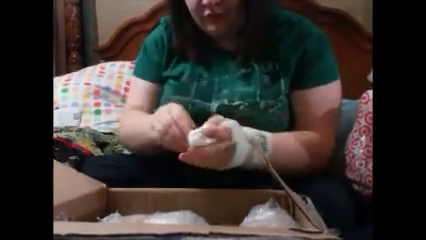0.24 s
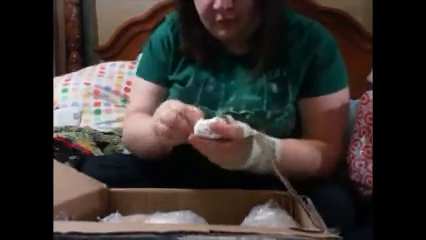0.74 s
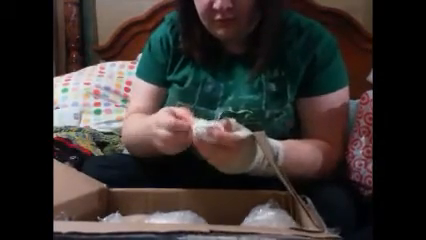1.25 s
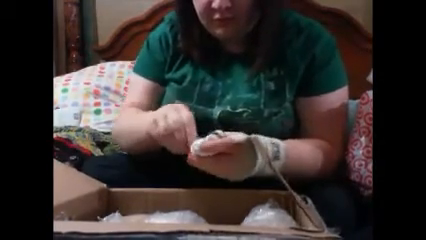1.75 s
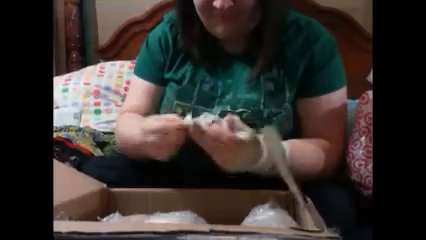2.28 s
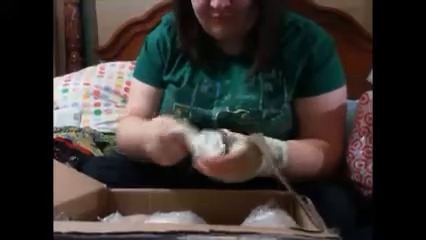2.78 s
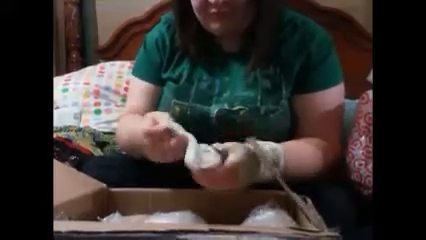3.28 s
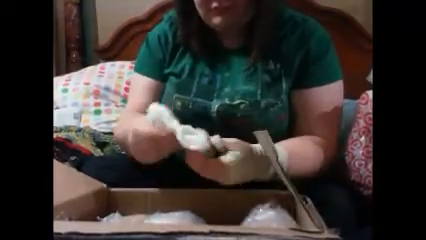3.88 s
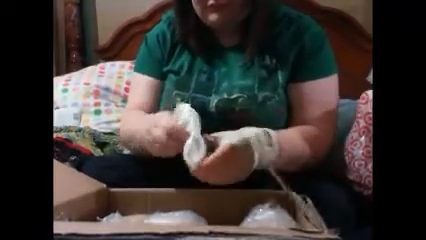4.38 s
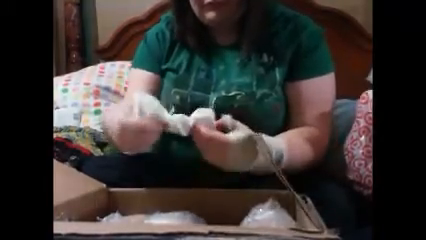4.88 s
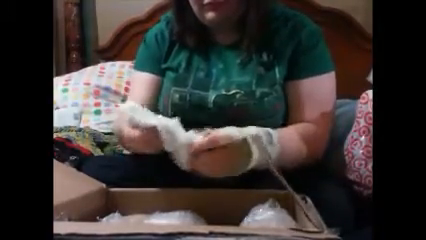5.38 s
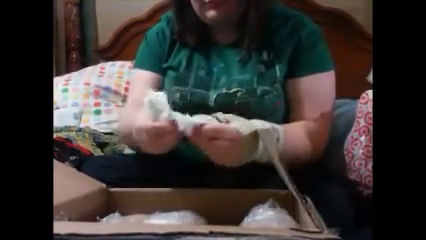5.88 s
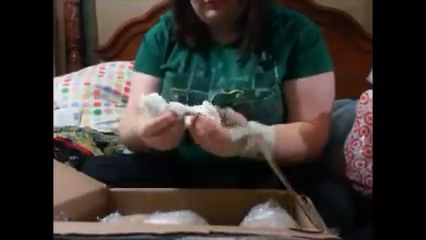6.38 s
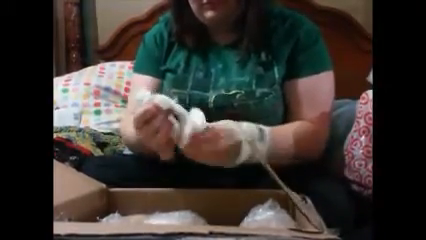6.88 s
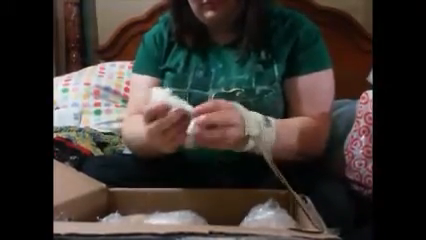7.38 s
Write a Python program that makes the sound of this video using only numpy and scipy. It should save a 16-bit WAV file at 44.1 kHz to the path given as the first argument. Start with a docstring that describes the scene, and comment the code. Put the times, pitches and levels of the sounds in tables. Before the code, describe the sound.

A quiet small room with a faint steady hiss, close microphone, sound almost all on the left. From 0.2 s fingers pick at tissue paper: light rustle, small scrapes and scattered dry snaps, sharp ones near 0.5, 0.95, 1.4 and 1.8 s. Around 2.4 s a fold gives way with a loud crack and a rip of about a tenth of a second, ringing hollow briefly; more snaps follow until 2.85 s, when a strong swish of sliding paper arrives. Short scrapes at 3.1 s, then soft full strokes from 3.7 to 4.1 s and the broadest at 4.5 to 4.8 s. Deep, soft bumps and rumble of arms on the bed sit beneath, notably at 2.5, 3.9 to 4.3 and 5.6 s. Quick rustles continue from 5.6 to 6.5 s with fewer clicks, then fade to gentle crinkling and faint rubs until about 7.6 s.

```python
"""A small room with a faint, short, bright tail, and a bed: hands unwrap tissue paper from an object.
Sliding paper is filtered noise with stick-slip clicks; small wrinkles tick as resonant clicks.
Fingers pick at the wrapping: scrapes are runs of slips, and snaps are pulses through a resonance.
A fold rips open in dense slips with a short modal ring, then the sheet slides off in soft strokes.
Arm movements rumble as low noise and bump the bed as damped low sines, over a faint steady hiss."""
import sys
import numpy as np
from scipy import signal
from scipy.fft import rfft, irfft
from scipy.io import wavfile
from scipy.ndimage import uniform_filter1d

SR = 44100
rng = np.random.default_rng(int(sys.argv[2]) if len(sys.argv) > 2 else 0)


def persist_wave(psi):
    """Save psi, clipped to +-1, as 16-bit WAV."""
    counts = np.round(np.clip(psi, -1, 1) * 32767).astype(np.int16)
    wavfile.write(sys.argv[1], SR, np.atleast_2d(counts).T)


N = 337365
TIME = np.arange(N) / SR  # s
FREQS = np.fft.rfftfreq(N, 1 / SR)  # Hz


def amp(db):
    """Logarithmic level: decibels become an amplitude gain."""
    return 10 ** (np.asarray(db) / 20)


def unit(x):
    """Normalisation of mean power: scales a signal to rms 1."""
    return x / np.sqrt(np.mean(x ** 2) + 1e-20)


def read(points, hz):
    """Log-frequency interpolation: reads the second column of a table at the given frequencies."""
    f, value = np.transpose(points)
    return np.interp(np.log(hz + 1), np.log(f + 1), value)


def curves(rows):
    """Linear interpolation in time: each column after the first becomes a curve over the scene."""
    s, *columns = np.transpose(rows)
    return [np.interp(TIME, s, column) for column in columns]


def add(mix, s, sound):
    """Superposition: adds a sound to the mix in place, from time s in seconds."""
    part = mix[max(round(s * SR), 0):][:len(sound)]
    part += sound[:len(part)]


def colour(x, points, size=2048):
    """Minimum-phase filtering: the log spectrum alone fixes the phase of a causal response."""
    hz = abs(np.fft.fftfreq(size, 1 / SR))
    log_gain = np.log(amp(np.maximum(read(points, hz), -100)))
    # The Hilbert transform of the log gain gives the phase
    taps = np.fft.ifft(np.exp(np.conj(signal.hilbert(log_gain)))).real
    return signal.oaconvolve(x, taps[:size // 2])[:len(x)]


def noise(points):
    """Stationary random noise: white noise shaped in the frequency domain, at rms 1."""
    return unit(irfft(rfft(rng.standard_normal(N)) * amp(read(points, FREQS)), N))


def resonate(x, hz, width):
    """Simple resonance, applied twice for steep skirts: gain 1 at hz, width in Hz."""
    b, a = signal.iirpeak(min(hz, SR / 2 - 1), hz / min(width, SR / np.pi), fs=SR)
    once = signal.lfilter(b, a, x)
    return signal.lfilter(b, a, once)


def slips(per_s, spread_db, size):
    """Stick-slip friction: clicks at random moments, most small and a few large, at rms 1."""
    heights = amp(spread_db * np.minimum(rng.exponential(1, size), 4))
    signed = heights * rng.choice([-1, 1], size)
    return unit(signed * (rng.random(size) < per_s / SR))


def wobble(size):
    """Random modulation: noise averaged over size samples, at rms 1."""
    return unit(uniform_filter1d(rng.standard_normal(N), size))


# Spectrum of the faint steady hiss.
# Each row: frequency in Hz, relative spectral level in dB per Hz.
HISS_SPECTRUM = [(20, 0), (55, -2.5), (130, -14.5), (255, -26.5), (380, -21), (700, -37), (1000, -27),
                 (1800, -40), (7000, -41), (16000, -38.5)]


def steady_hiss(level_db=-56.5):
    """Stationary background noise: a fixed spectrum at a constant level."""
    return amp(level_db) * noise(HISS_SPECTRUM)


# Murmur of the held paper, which never quite rests.
# Each row: time in seconds, level in dB of the 900-3500 Hz band before the layer gain.
HELD_PAPER = [(0, -79.5), (.3, -68.5), (1.35, -68), (1.85, -65), (2.7, -64.5), (3.55, -66), (4.05, -67),
              (5.4, -62), (5.54, -73.5), (5.7, -65), (6.05, -58), (6.85, -65.5), (7.65, -60.5)]
# Strokes in which paper slides on paper.
# Each row: start in seconds, length in seconds, level in dB of the 900-3500 Hz band before the
# layer gain, brightness in dB, relative level below 900 Hz in dB.
SLIDING_STROKES = [(0.258, 0.11, -68.5, 0, 3), (.52, 0.16, -64, -2, -4.5), (0.642, 0.32, -63, 8, -5.5),
                   (0.908, 0.1, -54, 0, -5.5), (1.017, 0.079, -70, 11.5, -9), (1.114, 0.084, -61, 2, -9),
                   (1.271, 0.051, -73, 13.5, -8), (1.372, .15, -61, 3.5, -6), (1.58, .19, -63, -9, -15),
                   (1.758, 0.21, -61, 1.5, -9), (1.984, 0.049, -65, 9.5, -7), (2.12, 0.25, -68.5, 1.5, -6),
                   (2.44, 0.23, -59.5, -6, -6.5), (2.784, 0.18, -53, -3, -4), (2.847, 0.26, -43, -2, -4.5),
                   (3.15, 0.17, -59, -4, -3.5), (3.302, 0.15, -63.5, 4, -13), (3.496, 0.043, -67.5, 8, 6.5),
                   (3.58, 0.14, -69, 6, -5), (3.662, .16, -51, -1, -6), (3.802, 0.13, -51, -0.5, -5.5),
                   (3.874, 0.27, -54.5, 1.5, -3.5), (4.125, 0.064, -63, 6, -4),
                   (4.173, .11, -57, -2.5, -11), (4.3, 0.036, -67.5, 15.5, -8),
                   (4.37, 0.21, -58.5, -4.5, -8), (4.508, .17, -45, -7, -14.5),
                   (4.588, 0.18, -46.5, -1.5, -6.5), (4.807, 0.16, -52.5, -3.5, -12),
                   (4.977, 0.12, -58.5, 1, -19), (5.17, 0.17, -56.5, -1.5, -6), (5.36, 0.17, -64, -4, -5),
                   (5.579, 0.098, -59.5, -3, -2.5), (5.66, .08, -62.5, 3, -16),
                   (5.763, 0.19, -51.5, -4, -6), (5.904, 0.12, -49.5, 1.5, -6.5),
                   (6.068, 0.12, -50.5, 2, -19), (6.157, 0.16, -63, -13, 0), (6.293, 0.16, -53, -2.5, -9.5),
                   (6.447, 0.18, -57, 2, -15), (6.576, 0.3, -62, -4.5, -24), (6.854, 0.16, -60.5, -6, -14),
                   (7.022, 0.19, -60, -3, -8), (7.24, 0.096, -65.5, 5.5, -3), (7.404, 0.18, -65, 11, 1),
                   (7.532, 0.087, -64.5, 0, 1)]


def sliding(speed_up=0.38, slow_down=0.4, speed_law=0.88):
    """Friction noise grows with speed: level in dB, then shine, fizz and weight relative to it."""
    # speed_up and slow_down are shares of a stroke; amplitude goes as speed ** speed_law
    def band_power(db, bright_db, weight_db):
        # Shine is 3.5-6.5 kHz and fizz lies above; both rise with brightness
        shine_db, fizz_db = -3 + 0.63 * bright_db, -3.5 + bright_db
        return amp(db + np.array([[0], [shine_db], [fizz_db], [weight_db]])) ** 2

    power = band_power(curves(HELD_PAPER)[0], bright_db=-0.5, weight_db=-5.5)
    for s, length, db, bright_db, weight_db in SLIDING_STROKES:
        u = np.linspace(0, 1, int(length * SR))
        ramp = np.minimum(u / speed_up, (1 - u) / slow_down)
        speed = np.sin(np.pi / 2 * np.clip(ramp, 0, 1))
        for band, top in zip(power, band_power(db, bright_db, weight_db)):
            add(band, s, top * speed ** (2 * speed_law))
    level, *bands = 10 * np.log10(power)
    return [level] + [band - level for band in bands]


def patches(patchy_db):
    """Changing radiation as folds change shape: drifting dB patches, frames by frequency bins."""
    field = rng.standard_normal((N // 256 + 5, 513))
    over_time = uniform_filter1d(field, size=14, axis=0)
    return patchy_db * unit(uniform_filter1d(over_time, size=12, axis=1))


# Spectrum of the tissue's rustle, before each band is levelled.
# Each row: frequency in Hz, relative spectral level in dB per Hz.
TISSUE_SPECTRUM = [(130, -10), (200, 2), (290, -0.5), (480, -0.5), (650, -3.5), (1000, -1), (1700, -0.5),
                   (2600, -1), (4400, -4), (5900, -7), (7500, -12.5), (10300, -8), (12500, -14),
                   (16000, -15)]


def rustle(grain=0.57, clump_db=1.5, patchy_db=1.72, level_db=-1, merge_db=-52):
    """Stick-slip friction: fibre haze and coarser crinkles merge into hiss in the loud, fast strokes."""
    level, shine, fizz, weight = sliding()
    roughness = .5 + 1 / (1 + amp(level - merge_db))
    crinkles = grain * roughness * slips(1100, 2.53, N)
    clumps = amp(clump_db * roughness * wobble(size=220))
    drive = (rng.standard_normal(N) + crinkles) * clumps
    z = signal.stft(colour(drive, TISSUE_SPECTRUM), nperseg=1024, noverlap=768)[2]
    patched = z * amp(patches(patchy_db)[:z.shape[1]].T)
    sheet = rfft(signal.istft(patched, nperseg=1024, noverlap=768)[1][:N])
    # Successive low-pass curves; their differences are the four bands
    below = [0] + [1 / (1 + (FREQS / hz) ** 10) for hz in (900, 3500, 6500)] + [1]
    out = np.zeros(N)
    for lower, upper, share in zip(below, below[1:], [weight, 0, shine, fizz]):
        band = unit(irfft(sheet * (upper - lower), N))
        out += band * amp(level + share + level_db)
    return out


def ticks(per_s=36, level_db=-10, ring_s=0.002, ceiling_db=-56):
    """Small wrinkles buckle at random: clicks excite resonances and follow the sliding to a ceiling."""
    level = np.minimum(sliding()[0], ceiling_db)
    t, out = np.arange(SR // 200) / SR, np.zeros(N)
    facets_hz = (2220, 3800, 5770, 11000)
    for hz in facets_hz:
        shiver = resonate(rng.standard_normal(len(t)) * np.exp(-t / ring_s), hz, hz)
        clicks = slips(per_s / len(facets_hz), 2.0, N)
        out += unit(signal.oaconvolve(clicks, shiver)[:N])
    return unit(out) * amp(level + level_db)


# Rumble of arms and clothes shifting.
# Each row: time in seconds, level in dB.
HANDLING_LEVEL = [(0, -83), (.55, -58), (1.15, -48), (1.5, -59), (2.3, -55.5), (2.5, -47), (3.65, -55.5),
                  (3.97, -37.5), (4.35, -66), (4.7, -42.5), (5.1, -68), (5.9, -49.5), (6.8, -64.5),
                  (7.65, -55)]
# Spectrum of that rumble.
# Each row: frequency in Hz, relative spectral level in dB per Hz.
HANDLING_SPECTRUM = [(12, 1), (20, 9), (33, -3.5), (57, -1.5), (102, -14.5), (140, -23), (340, -52),
                     (400, -42), (520, -69), (880, -120)]


def handling():
    """Low-frequency random vibration: shaped noise rises and falls as arms and clothes shift."""
    level, = curves(HANDLING_LEVEL)
    return noise(HANDLING_SPECTRUM) * amp(level)


# Fingertips that drag over a fold or rub the wrapped object.
# Each row: start in seconds, level in dB before the fade and layer gain, resonance in Hz,
# resonance width in Hz, length in seconds.
FINGER_SCRAPES = [(0.195, -64.5, 1800, 2500, .018), (0.323, -47.5, 3450, 5850, 0.021),
                  (0.33, -49, 1180, 700, 0.0059), (0.507, -57.5, 3800, 1200, 0.047),
                  (0.704, -56.5, 1130, 1800, 0.061), (0.919, -54, 2500, 9000, 0.049),
                  (0.9373, -44.5, 3440, 14200, 0.045), (1.219, -50.5, 2200, 9100, 0.04),
                  (1.22, -53, 1120, 800, 0.036), (1.404, -48.5, 1010, 1590, .016),
                  (1.44, -57, 5300, 2500, 0.047), (1.783, -55, 3200, 5000, 0.032),
                  (2.884, -55.5, 375, 330, 0.25), (3.116, -51, 3070, 13600, 0.073),
                  (3.117, -48, 1170, 1000, 0.047), (3.147, -46, 1370, 2600, 0.023),
                  (3.846, -46, 140, 129, 0.086), (3.982, -45.5, 297, 600, 0.027),
                  (3.983, -42.5, 2010, 5000, 0.015), (4.299, -52, 260, 397, 0.0185),
                  (4.364, -54.5, 1900, 3500, 0.021), (6.865, -60, 1650, 2500, 0.09),
                  (7.141, -60, 5200, 3000, 0.047), (7.395, -56, 5330, 2200, 0.039),
                  (7.445, -53.5, 5100, 2500, 0.05)]


def scrapes(level_db=2):
    """Stick-slip excitation of a resonance: a fingertip lets go in a quick, fading run of slips."""
    out = np.zeros(N)
    for s, db, hz, width, length in FINGER_SCRAPES:
        u = np.linspace(0, 1, int(length * SR))
        run = unit(resonate(slips(7000, 6.3, len(u)), hz, width))
        fade = np.sqrt(1 - u) * np.exp(-.6 * u)
        add(out, s, amp(db + level_db) * run * fade)
    return out


# Creases that buckle.
# Each row: start in seconds, peak level in dB before the layer gain, resonance in Hz,
# decay time of the shiver in milliseconds, share of wide-band crack (a ratio).
CREASE_SNAPS = [(.281, -45, 1910, 1.1, 0.13), (.401, -42.5, 12000, 0.57, .27), (.501, -29, 2860, 1.7, .022),
                (.512, -38, 2500, .5, 0.44), (.558, -40.5, 8300, 1.5, .2), (.615, -35, 8500, 1.1, .4),
                (0.767, -33.5, 9700, .9, 0.93), (0.942, -26, 4900, 0.71, .5),
                (1.146, -36.5, 3040, 0.78, .1), (1.2191, -34.5, 1120, 1.6, 0.12),
                (1.322, -37.5, 2380, 1.1, .04), (1.41, -28.5, 2650, 1.05, 0.74), (1.479, -36, 4200, .8, .1),
                (1.5363, -32, 3400, 2.1, 0.39), (1.62, -45, 9000, .6, .4), (1.783, -23.5, 3900, 1.1, 0.1),
                (1.827, -27.5, 5400, 1.1, 0.53), (1.881, -42, 4100, .6, .2), (1.891, -38, 3520, .5, .1),
                (1.937, -40, 4470, 4.2, 0.28), (2.187, -35, 3540, 1.8, 0.17),
                (2.3729, -24, 1760, 1.7, 0.067), (2.448, -33, 2800, .8, .15),
                (2.4559, -23, 3280, 0.56, .32), (2.557, -23.5, 3700, 0.74, 0.34),
                (2.59, -35, 2250, 1.8, 0.2), (2.618, -42.5, 1200, 1, .13), (2.8326, -25.5, 3640, 1, 1),
                (3.203, -32, 2900, 1.9, .02), (3.51, -38.5, 3100, 1.5, .52), (3.596, -37.5, 7400, 3, 1),
                (3.77, -38, 2470, 1.3, 0.16), (3.986, -32, 1820, 0.58, 0.31), (4.262, -40, 5000, 1, 0.87),
                (4.934, -38, 2500, .6, .3), (5.601, -43, 2360, .78, .2), (6.23, -38, 5100, 0.55, 0.98),
                (7.142, -44, 5220, 1.9, .017)]


def snaps(shiver=0.86, level_db=0.63):
    """Snap-through buckling: a crease gives one sharp pulse, and the facet around it shivers briefly."""
    out, ms = np.zeros(N), np.arange(SR // 50) * 1000 / SR
    for s, db, hz, decay_ms, crack in CREASE_SNAPS:
        push = shiver * rng.choice([-1, 1], len(ms)) * np.exp(-ms / decay_ms)
        push[:3] += [1, 2, 1]  # the sharp pulse
        pop = resonate(push, hz, hz) + crack * resonate(push, 8000, 14000)
        add(out, s, amp(db + level_db) * pop / abs(pop).max())
    return out


# Bumps on the bed.
# Each row: start in seconds, level in dB before damping and layer gain, frequency in Hz.
BED_BUMPS = [(1.018, -41.5, 29.5), (1.121, -44, 44.4), (2.376, -37, 61.6), (2.41, -35.5, 52),
             (2.563, -29.5, 33), (2.683, -40, 30.6), (3.703, -36, 38.3), (3.851, -35, 91),
             (3.874, -29.5, 68.4), (3.987, -29, 45), (4.044, -37, 27.6), (4.299, -28.5, 33),
             (4.548, -41.5, 43.4), (5.404, -39, 30.7), (5.607, -33, 32.5), (5.782, -35.5, 31.8),
             (6.13, -42, 56.6), (6.482, -42.5, 62)]


def thuds(level_db=5, pad=0.046, onset_cycles=0.12, ring_cycles=1.0):
    """Damped oscillation: each bump rocks the mattress for a cycle or two, with a soft pat of noise."""
    out, t = np.zeros(N), np.arange(SR // 4) / SR
    for s, db, hz in BED_BUMPS:
        cycles = hz * t
        envelope = (1 - np.exp(-cycles / onset_cycles)) * np.exp(-cycles / ring_cycles)
        rock = np.sin(2 * np.pi * cycles) * envelope
        pat = unit(resonate(rng.standard_normal(len(t)), 126, 180)) * np.exp(-t / 0.019)
        add(out, s, amp(db + level_db) * (rock + pad * pat))
    return out


RIP_S = 2.3735  # moment at which the fold gives way, s


def tearing(jolt_db=-27, jolt_decay_s=.0025, peel_db=-32.5, fade_db_per_s=-165,
            peel_s=0.096, release_s=0.037):
    """Sudden release of tension: a brief jolt, then a peel that fades and lets go (an amplitude)."""
    t = TIME - RIP_S
    jolt = amp(jolt_db) * np.exp(-abs(t) / jolt_decay_s)
    fade = amp(peel_db + fade_db_per_s * np.clip(t, 0, peel_s))
    peel = fade * np.clip((peel_s - t) / release_s, 0, 1)
    return jolt + peel * (t > 0)


# Spectrum of the ripping slips.
# Each row: frequency in Hz, relative spectral level in dB per Hz.
RIP_SPECTRUM = [(170, -9), (340, -12), (480, -3), (720, -5.5), (950, 1), (1350, -7), (1550, -6), (1750, -4),
                (2600, -6.5), (3900, -5.5), (5000, -14), (10000, -16.5), (16000, -19)]
# Modes of the wrapping and the open box, set ringing by the rip.
# Each row: frequency in Hz, starting level in dB, time to decay by 60 dB in seconds.
RIP_MODES = [(807, -41, 0.15), (900, -37.5, 0.21), (1110, -35, 0.063), (1200, -31, 0.08),
             (1330, -36.5, 0.14), (1750, -32, 0.098), (1954, -42, 0.11), (2340, -38.5, 0.22),
             (3290, -57, .16)]


def rip(level_db=1):
    """Fracture and modal ringing: dense slips follow the tear, and hollow modes decay from its start."""
    pull = amp(level_db) * tearing()
    out = unit(colour(slips(7000, 1.5, N), RIP_SPECTRUM)) * pull
    t = np.arange(SR // 3) / SR
    for hz, db, t60 in RIP_MODES:
        decay = amp(db - 60 * t / t60)
        add(out, RIP_S, rng.choice([-1, 1]) * decay * np.sin(2 * np.pi * hz * t))
    return out


# Reverberation of the room.
# Each row: frequency in Hz, time to decay by 60 dB in seconds.
ROOM_DECAY = [(200, 0.41), (1000, 0.11), (4000, 0.19), (14000, 0.32)]


def room(x):
    """Reverberant decay: sparse reflections of random sign, each band dying at its own speed."""
    size = SR // 3
    hits = rng.random(size) < 2500 / SR  # 2500 reflections per second on average
    late = np.arange(size) > .004 * SR
    taps = rng.choice([-1., 1.], size) * hits * late
    hz, t, z = signal.stft(taps, SR, nperseg=256)
    decay = amp(-60 * t / read(ROOM_DECAY, hz)[:, None])
    tail = signal.istft(z * decay, SR, nperseg=256)[1]
    return signal.fftconvolve(x, tail / np.linalg.norm(tail))[:N]


def scene(wet_db=-12):
    """Superposition: paper and its short room tail, over the bed's rumble and a faint steady hiss."""
    paper = rustle() + ticks() + scrapes() + snaps() + rip()
    bed = handling() + thuds()
    out = steady_hiss() + paper + amp(wet_db) * room(paper) + bed
    return np.array([out, out])


def record(dry, left_db=6.0, right_db=-15.5, edge_hz=16000):
    """Polarity and band limiting: the right is a faint inverted copy, then both are low-passed."""
    pair = np.array([amp(left_db) * dry[0], -amp(right_db) * dry[1]])
    low_pass = signal.firwin(511, edge_hz, window=("kaiser", 9), fs=SR)
    return signal.oaconvolve(pair, low_pass[None], "same")


dry = scene()
out = record(dry)
persist_wave(out)
```